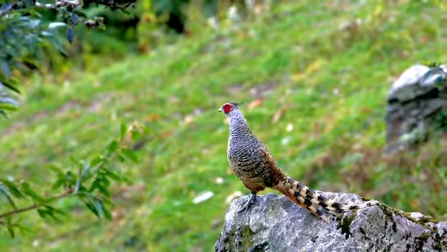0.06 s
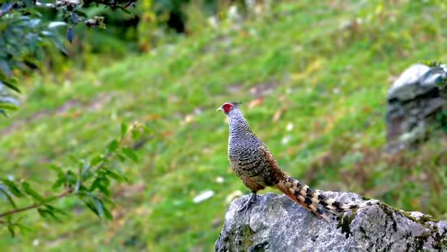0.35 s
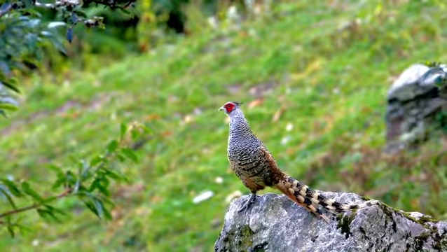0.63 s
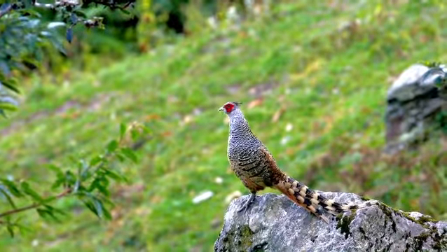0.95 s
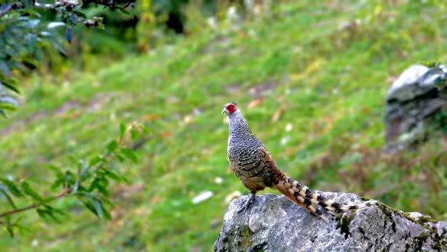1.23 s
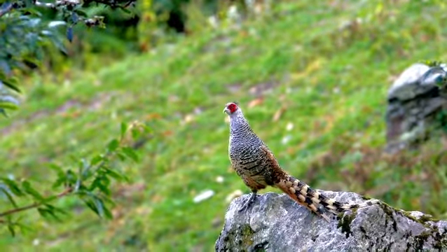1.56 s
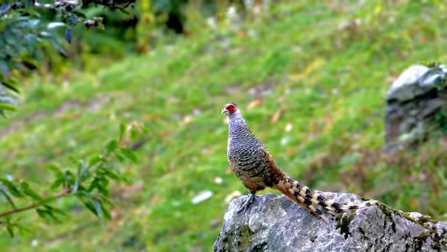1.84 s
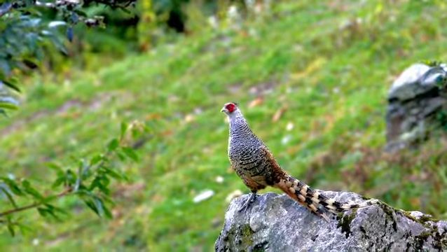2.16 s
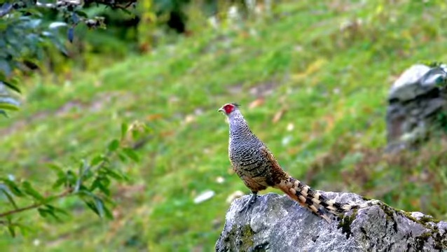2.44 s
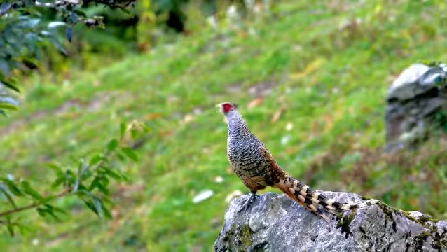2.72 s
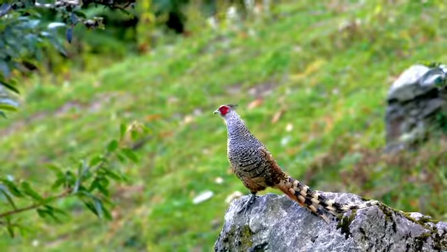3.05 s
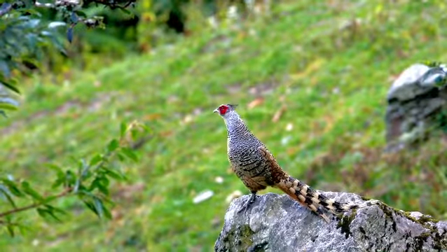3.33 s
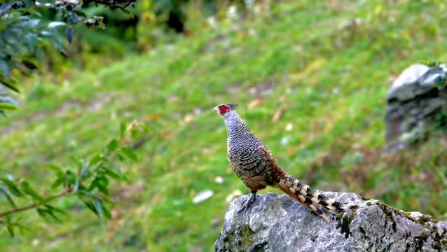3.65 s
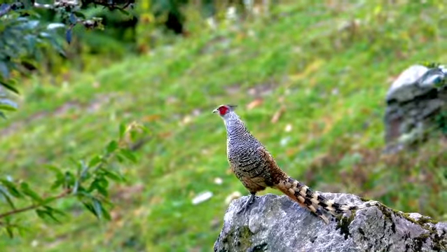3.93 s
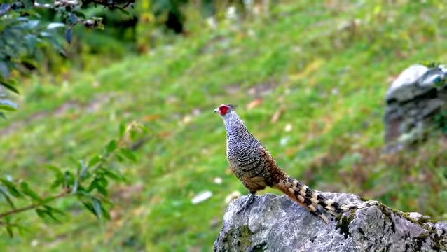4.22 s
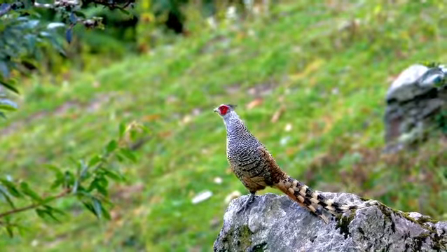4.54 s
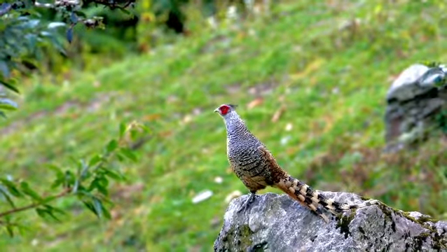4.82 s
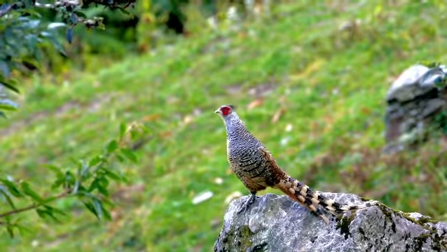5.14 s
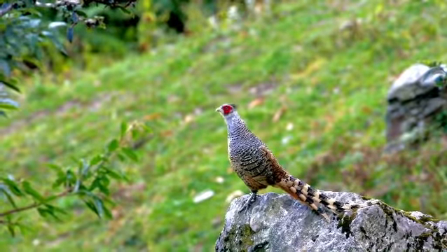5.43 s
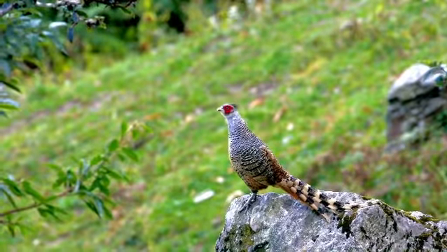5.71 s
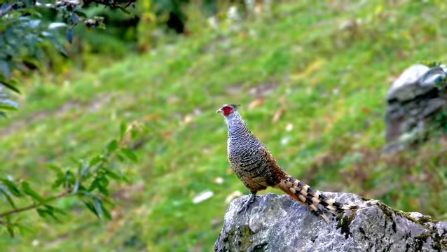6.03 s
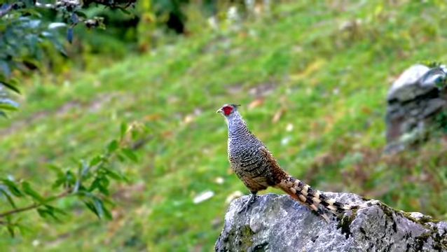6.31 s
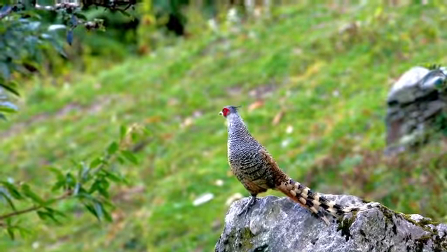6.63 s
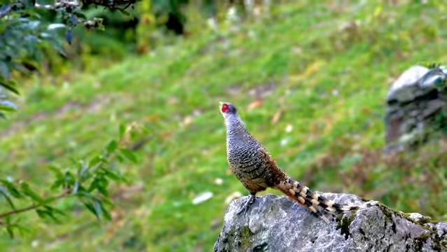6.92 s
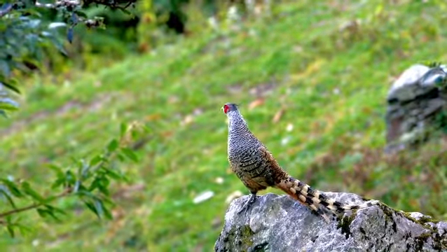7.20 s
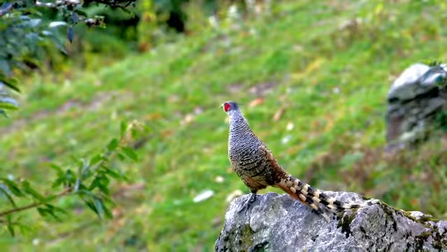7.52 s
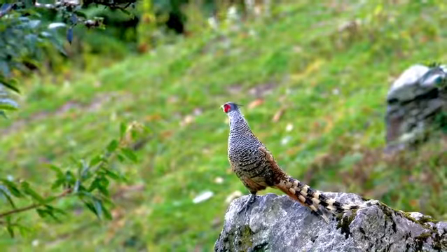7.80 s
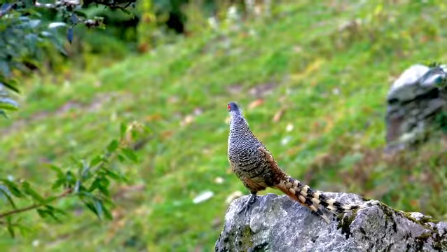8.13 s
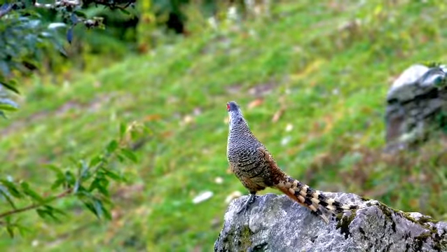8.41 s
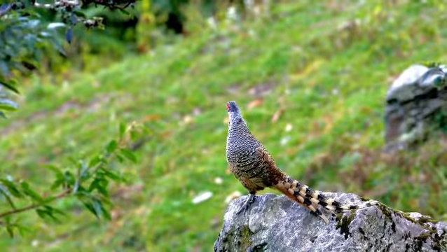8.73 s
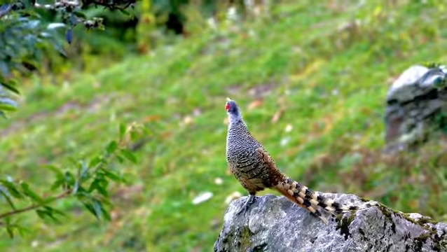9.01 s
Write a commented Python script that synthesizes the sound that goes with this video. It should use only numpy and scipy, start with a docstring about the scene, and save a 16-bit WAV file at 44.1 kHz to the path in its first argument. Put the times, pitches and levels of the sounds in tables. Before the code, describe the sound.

Short, raspy pheasant clucks repeat steadily with a light outdoor echo, starting soft, getting stronger and closing with one quick upward whistle.

```python
"""Soft, buzzy chucks over the hush of a valley: a pheasant on a rock, heard from one microphone.
The long series grows louder and more tonal as the bird warms up, and ends in a rising whistle.
Each chuck is a falling reed tone chopped by a slower flutter of the syrinx.
Rocks close by scatter the calls and the far side of the valley sends them back.
Well behind the bird are a faint distant drone and three dry ticks in the bushes."""
import sys
import numpy as np
from scipy import signal
from scipy.fft import rfft, irfft, next_fast_len
from scipy.io import wavfile
from scipy.ndimage import map_coordinates

SR = 44100
rng = np.random.default_rng(int(sys.argv[2]) if len(sys.argv) > 2 else 0)


def transcribe(signal):
    """Save signal, clipped to [-1, 1], as a 16-bit WAV file at the path in sys.argv[1]."""
    frames = np.atleast_2d(signal).T
    limited = np.clip(frames, -1, 1)
    pcm = np.round(limited * 32767).astype(np.int16)
    wavfile.write(sys.argv[1], SR, pcm)


N = 408366
TIME = np.arange(N) / SR

# spectrum of the valley air: f/Hz, relative level/dB
AIR_SPECTRUM = [(40, -26.5), (80, -19), (120, -14), (200, -5.5), (320, 1.5), (470, -4), (650, -0.5),
                (1000, -4.5), (2000, -9.5), (3000, -22.5), (6200, -23.5), (7800, -37.5), (11000, -39.5),
                (14000, -40.5)]
# ticks in the bushes: t/s, relative level/dB
BUSH_TICKS = [(1.7347, -64), (7.861, -63), (8.802, -57.5)]
# colour that the terrain gives the echoes: f/Hz, gain/dB
ECHO_COLOUR = [(300, 7.5), (800, -6.5), (1350, -1.5), (1900, 3), (2200, 1.5), (2500, -2.5), (2850, 3),
               (3500, -4.5), (4300, -3.5), (7000, 2), (11000, -15.5)]
# reflections from boulders close by: delay/s, gain/dB
BOULDER_PATHS = [(.013, -17), (.022, -18), (.028, -19.5)]
# contour of the closing whistle: t/s, level/dB
WHISTLE_CONTOUR = [(9.128, -29), (9.13, -27.5), (9.162, -27.5), (9.18, -37.5), (9.255, -29.5)]
# overtones of the reed before effort tilts them: harmonic number, relative level/dB
REED_OVERTONES = [(2, -5), (3, 1.5), (4, -13.5), (5, -43), (6, -38)]
# throat resonances that colour the buzz: f/Hz, gain/dB
THROAT_COLOUR = [(500, -39), (950, -23.5), (1250, 10.5), (1700, 2.5), (2100, 1.5), (2450, -8), (2750, -26),
                 (3100, -5.5), (3400, -7.5), (3800, -34), (4850, -6.5), (6000, -26), (10000, -30),
                 (12000, -52)]
# colour of the rasp: f/Hz, gain/dB
RASP_COLOUR = [(500, -22.5), (1000, -3), (1600, 10.5), (3200, 4.5), (5000, 9.5), (6400, -2.5), (8500, -0.5),
               (10200, -5), (11500, -29.5), (14000, -34.5)]
# the chucks: t/s, effort (0-1), tone f/Hz, flutter f/Hz, tone level/dB,
# buzz level/dB re the tone, overtone level/dB re the tone
CHUCK_SERIES = [(-0.135, 0.04, 1319, 461, -39, 4.5, -4.5), (0.189, 0.02, 1342, 460, -40.5, 9.5, -11),
                (0.5165, 0, 1341, 434, -41, 8, -10.5), (0.848, 0, 1309, 442, -43, 11, -8.5),
                (1.1763, .1, 1383, 488.4, -39.5, 10.5, -7), (1.528, .2, 1370, 488, -37, 7, -5),
                (1.9153, 0.68, 1361, 521.3, -32, 3.5, -7.5), (2.3282, 0.91, 1368, 538.6, -30.7, 0, -6),
                (2.767, 0.86, 1378, 559.6, -30, -1.5, -7.5), (3.1788, 0.87, 1390, 583.6, -29.5, -1.5, -8),
                (3.6259, 0.88, 1385, 552, -29.5, -0.5, -10), (4.052, 0.98, 1384, 575.6, -27.5, -2.5, -10.5),
                (4.4999, 0.91, 1390, 573.7, -28, -1, -9.5), (4.9385, 0.94, 1407, 609, -28, -6, -6.5),
                (5.3779, .95, 1400, 605.3, -27.5, -3.5, -8), (5.8256, 0.97, 1400, 611.7, -26.5, -3.5, -9.5),
                (6.433, 0.98, 1394, 581, -29, 2, -9), (6.9469, .95, 1430, 645.4, -27.5, -6, -14),
                (7.45, 0.96, 1421, 635, -27.5, -5, -13), (7.966, 1, 1409, 635, -27.5, -4, -11),
                (8.5032, 1, 1417, 630, -26.5, -6.5, -10.5), (9.0326, 0.97, 1428, 614, -25.5, -3, -12.5)]

# pairs run from the softest call (effort 0) to the loudest (effort 1)
HOLD_S, TONE_ATTACK_S = (.025, .038), (.001, .0047)  # the hold ends when the pressure is let go
TONE_DROOP_DB_PER_S, TONE_RELEASE_DB_PER_S = (191, 21.5), (550, 1899.5)
OVERTONE_DROOP_DB_PER_S = (850, 339)
ONSET_BEND, SINK_PER_S, RELEASE_DROP = (-.19, .015), (4, .66), (.2, .354)  # shares of the pitch
FLUTTER_DELAY_S, FLUTTER_RUSH = (.0042, .0098), (.3, .1003)  # it starts late, too fast by this share
UNSTEADINESS = (.79, .52)
SIDEBAND_DB, RASP_DB = (-8, -3), (-40, -20.5)
GULP_DB, GULP_LAG_S = (-37.5, -41.5), (.005, .0086)
NEAR_DB, FAR_DB = (-11.5, -9.5), (-20, -14)  # echoes re the call, before colouring
FAR_FADE_DB_PER_S, ECHO_TREBLE_DB = (150.5, 70), (-.5, 2.5)
# late in the series the bird turns away: less treble reaches the microphone direct, more the slopes
TURN_S, TURN_SIDEBAND_DB, TURN_RASP_DB, TURN_FAR_DB, TURN_ECHO_TREBLE_DB = 6.7, -4.5, -12.5, 2.15, 3


def amp(db):
    return 10 ** (np.asarray(db) / 20)


def unit(x):
    return x / np.sqrt(np.mean(x ** 2) + 1e-20)


def coloured(x, points):
    """x through a gain curve of (f/Hz, gain/dB) points on a log frequency axis."""
    size = next_fast_len(len(x) + 2048)
    hz, db = np.transpose(points)
    gain = amp(np.interp(np.log(np.fft.rfftfreq(size, 1 / SR) + 1), np.log(hz), db))
    return irfft(rfft(x, size) * gain, size)[:len(x)]


def wobble(rate, size):
    """A smooth random curve, rate knots a second."""
    return map_coordinates(rng.standard_normal(1024), [np.arange(size) * rate / SR], mode="wrap")


def add(track, s, x):
    """Mix x into the track from time s on."""
    start = round(s * SR)
    x = x[max(-start, 0):max(N - start, 0)]
    track[max(start, 0):][:len(x)] += x


def by_effort(pair, effort):
    """A value between that of the softest and that of the loudest call."""
    return pair[0] + effort * (pair[1] - pair[0])


def step(t, width_s):
    """A smooth rise from 0 to 1 around t = 0."""
    return .5 + .5 * np.tanh(.5 * t / width_s)


def envelope(t, attack_s, hold_s, droop_db_per_s, release_db_per_s):
    """Attack, a drooping hold, release."""
    decay_db = droop_db_per_s * t + release_db_per_s * np.maximum(t - hold_s, 0)
    return (1 - np.exp(-t / attack_s)) * amp(-decay_db)


def valley_air(level_db=-63.5):
    """The soft, slightly wavering rush of the valley around the microphone."""
    rush = unit(coloured(rng.standard_normal(N), AIR_SPECTRUM))
    return rush * amp(level_db + .6 * wobble(2.8, N))


def far_drone(peak_s=5.2, peak_db=-69.5, fade_db_per_s=9.5):
    """A narrow band of noise in the distance that swells once and fades."""
    band = [(20, -120), (290, -48), (335, 0), (385, -40), (2000, -120)]
    drone = unit(coloured(rng.standard_normal(N), band))
    return drone * amp(peak_db - fade_db_per_s * np.abs(TIME - peak_s))


def bush_ticks(t60=.057):
    """Tiny dry ticks in the bushes, each a burst of high noise."""
    out, t = np.zeros(N), np.arange(SR // 20) / SR
    band = [(2500, -41), (4200, 1), (7000, -5), (9000, -30)]
    for s, db in BUSH_TICKS:
        grain = unit(coloured(rng.standard_normal(len(t)), band))
        add(out, s, amp(db - 7) * grain * amp(-60 * t / t60))
    return out


def valley_echoes(call, far_db, treble_db, fade_db_per_s, near_db=-9, near_t60=.43,
                  face_s=.11, rise_db_per_s=271, ridge_s=.24, ridge_drop_db=7.5, air_db_per_s=22):
    """Echoes of one call: a quick scatter from near rocks, then the answer of the far slope."""
    t = np.arange(int(.6 * SR)) / SR
    near = rng.standard_normal(len(t)) * amp(-60 * t / near_t60) * (1 - np.exp(-t / .0036))
    # the slope answers most strongly from its face, and falls quiet past its ridge
    past_face = t - face_s
    slope_db = np.minimum(rise_db_per_s * past_face, -fade_db_per_s * past_face)
    slope_db -= ridge_drop_db * step(t - ridge_s, .017)
    # trees and boulders make the far answer lumpy
    far = rng.standard_normal(len(t)) * amp(slope_db + 2.5 * wobble(90, len(t)))
    paths = amp(near_db) * near / np.linalg.norm(near) + amp(far_db) * far / np.linalg.norm(far)
    # long paths lose their treble in the air
    treble = coloured(paths, [(2800, -30.5), (4500, -4), (7000, 8)])
    paths = coloured(paths - treble + treble * amp(-air_db_per_s * t), ECHO_COLOUR)
    # the beak beams the treble: turned away, the bird sends more of it to the slopes
    paths = coloured(paths, [(2000, .011), (2800, treble_db), (8000, 2.7 * treble_db)])
    return signal.fftconvolve(call, paths)


def add_boulder_echoes(track, s, call):
    """Mossy boulders close by return dull copies; their paths shift as the bird moves its head."""
    dull = coloured(call, [(1800, 0), (3000, -15.5), (8000, -5)])
    for delay_s, db in BOULDER_PATHS:
        add(track, s + delay_s + rng.normal(0, .0005), amp(db) * dull)


def whistle(start_s=9.125, base_hz=3520, scoop_hz=1580, scoop_s=.023, climb_hz_per_s=4300):
    """A nearly pure tone that shoots up, then climbs slowly, with its echo from the valley."""
    t = np.arange(SR // 6) / SR
    hz = base_hz - scoop_hz * np.exp(-t / scoop_s) + climb_hz_per_s * t
    phase = 2 * np.pi * np.cumsum(hz * (1 + .0037 * wobble(400, len(t)))) / SR
    tone = unit(np.sin(phase) + amp(-44) * np.sin(2 * phase) + amp(-55) * np.sin(3 * phase))
    level_db = np.interp(start_s + t, *np.transpose(WHISTLE_CONTOUR)) + 1.1 * wobble(180, len(t))
    call = amp(level_db) * (1 - np.exp(-t / .0016)) * tone
    out = np.zeros(N)
    add(out, start_s, call)
    add(out, start_s, valley_echoes(call, far_db=-12.5, treble_db=3.5, fade_db_per_s=63))
    return out


def syrinx_phases(t, hold_s, effort, tone_hz, flutter_hz, slack_hz=450, settle_s=.0121):
    """Phases of the reed and the flutter: both sink in pitch, then drop on release."""
    bend = by_effort(ONSET_BEND, effort) * np.exp(-t / .0035)
    sink = by_effort(SINK_PER_S, effort) * (t - .01323)
    drop = by_effort(RELEASE_DROP, effort) * step(t - hold_s - .00817, .005615)
    pitch = 1 + bend - sink - drop
    # both grow more unsteady as the pressure falls
    unsteady = by_effort(UNSTEADINESS, effort) + 1.2 * np.minimum(t / hold_s, 1) ** 3
    tone_rate = tone_hz * pitch * (1 + .008 * unsteady * wobble(700, len(t)))
    # the flutter settles from its first rush and goes slack around the release
    rush = 1 + by_effort(FLUTTER_RUSH, effort) * np.exp(-t / settle_s)
    slack = step(t - hold_s + .0041, .0038)
    flutter_rate = (flutter_hz + slack * (slack_hz - flutter_hz)) * rush * pitch
    flutter_rate *= 1 + .05 * unsteady * wobble(250, len(t))
    return 2 * np.pi * np.cumsum([tone_rate, flutter_rate], axis=1) / SR


def reed_overtones(t, phase, effort, speak_s=.0042, vary_db=3):
    """Harmonics of the reed: duller in soft calls, the higher ones speaking later."""
    speaking = 1 - np.exp(-t / speak_s)
    tilt_db = 6 * (2 - effort)
    overtones = np.zeros(len(t))
    for k, db in REED_OVERTONES:
        gain = amp(db - tilt_db * (k - 3.5) + rng.normal(0, vary_db))
        overtones += gain * speaking ** (k - 2) * np.sin(k * phase)
    return overtones


def reed_rasp(phase, gate):
    """Treble bite from the reed's sharp closures and a puff of turbulence on each flutter."""
    closures = unit(sum(np.sin(k * phase) for k in range(3, 10)))
    turbulence = .8 * rng.standard_normal(len(phase))
    return coloured((closures + turbulence) * (gate + .2), RASP_COLOUR)


def gulp(flutter_phase, progress, effort):
    """The low close of a call: the flutter's fundamental gives way to its octave, with some noise."""
    fundamental = 1.24 * np.sin(flutter_phase) * np.clip(1.15 - progress, 0, 1)
    octave = np.sin(2 * flutter_phase) * np.minimum(progress, 1)
    noise = 2.4 * effort * rng.standard_normal(len(progress))
    band = [(300, -27.5), (560, .5), (850, 0), (1200, -23.5), (2500, -45)]
    return coloured(fundamental + octave + noise, band)


def chuck(effort, tone_hz, flutter_hz, tone_db, buzz_db, overtone_db, turned, sharpness=2.73):
    """One call, direct to the microphone: reed tone, overtones, flutter buzz, rasp and gulp."""
    t = np.arange(int(.1 * SR)) / SR
    hold_s = by_effort(HOLD_S, effort)
    progress = t / hold_s
    phase, flutter_phase = syrinx_phases(t, hold_s, effort, tone_hz, flutter_hz)
    tone, overtones = np.sin(phase), reed_overtones(t, phase, effort)
    gate = np.exp(sharpness * (np.cos(flutter_phase + rng.uniform(0, 2 * np.pi)) - 1))
    # once the flutter sets in, the reed closes unevenly and its overtones turn hoarse
    fluttering = step(t - by_effort(FLUTTER_DELAY_S, effort), .001)
    overtones *= 1 + .4 * fluttering * wobble(1105, len(t))
    # the flutter chops the reed, putting sidebands around every partial
    sideband_db = overtone_db - buzz_db + by_effort(SIDEBAND_DB, effort) + turned * TURN_SIDEBAND_DB
    buzz = coloured((tone + amp(sideband_db) * overtones) * (gate - gate.mean()), THROAT_COLOUR)
    rasp = reed_rasp(phase, gate)
    rasp_db = by_effort(RASP_DB, np.sqrt(effort)) + turned * TURN_RASP_DB

    tone_env = envelope(t, by_effort(TONE_ATTACK_S, effort), hold_s,
                        by_effort(TONE_DROOP_DB_PER_S, effort), by_effort(TONE_RELEASE_DB_PER_S, effort))
    overtone_env = envelope(t, .0019, 1.007 * hold_s, by_effort(OVERTONE_DROOP_DB_PER_S, effort), 1901)
    buzz_env = fluttering * envelope(t, .0038, hold_s, droop_db_per_s=162, release_db_per_s=1250.5)
    rasp_env = overtone_env * buzz_env ** .32 * np.exp(-.6 * progress ** 2)
    gulp_s = hold_s + by_effort(GULP_LAG_S, effort)
    gulp_env = np.exp(-.5 * ((t - gulp_s) / .0062) ** 2) + .12 * tone_env

    call = amp(by_effort(GULP_DB, effort)) * gulp(flutter_phase, progress, effort) * gulp_env
    for layer, db in [(tone * tone_env, 0), (buzz * buzz_env, buzz_db),
                      (overtones * overtone_env, overtone_db), (rasp * rasp_env, rasp_db)]:
        hold_rms = np.sqrt(np.sum(layer ** 2) / (hold_s * SR))
        call += amp(tone_db + db) * layer / hold_rms
    return call


def pheasant_chucks():
    """The series of calls from the rock, each with its own near and distant echoes."""
    out = np.zeros(N)
    for s, effort, *voice in CHUCK_SERIES:
        turned = s > TURN_S
        call = chuck(effort, *voice, turned)
        add(out, s, call)
        far_db = by_effort(FAR_DB, effort) + turned * TURN_FAR_DB
        treble_db = by_effort(ECHO_TREBLE_DB, effort) + turned * TURN_ECHO_TREBLE_DB
        fade_db_per_s = by_effort(FAR_FADE_DB_PER_S, effort)
        add(out, s, valley_echoes(call, far_db, treble_db, fade_db_per_s, by_effort(NEAR_DB, effort)))
        add_boulder_echoes(out, s, call)
    return out


def scene():
    """The bird and the valley as they reach the microphone, in mono."""
    return (pheasant_chucks() + whistle() + bush_ticks() + valley_air() + far_drone())[None]


def record(dry, low_cut_hz=110, top_hz=14000):
    """The microphone has a low cut against wind, and nothing passes above the band limit."""
    dry = signal.sosfilt(signal.butter(3, low_cut_hz, "highpass", fs=SR, output="sos"), dry)
    size = next_fast_len(N + SR // 4)
    in_band = np.fft.rfftfreq(size, 1 / SR) < top_hz
    return irfft(rfft(dry, size) * in_band, size)[:, :N]


dry = scene()
out = record(dry)
transcribe(out)
```